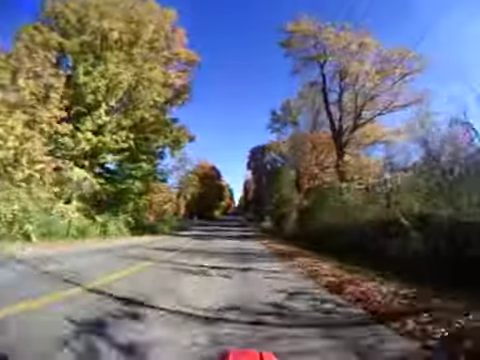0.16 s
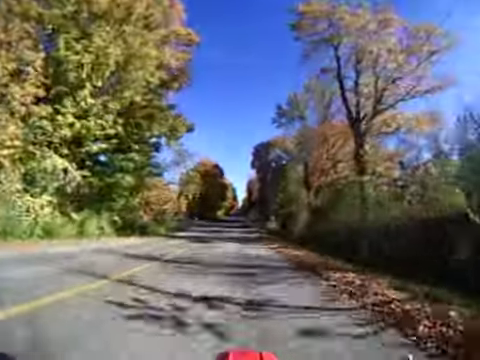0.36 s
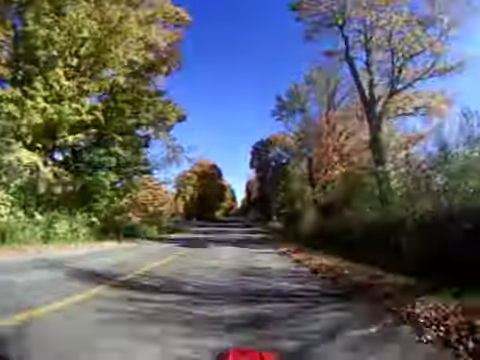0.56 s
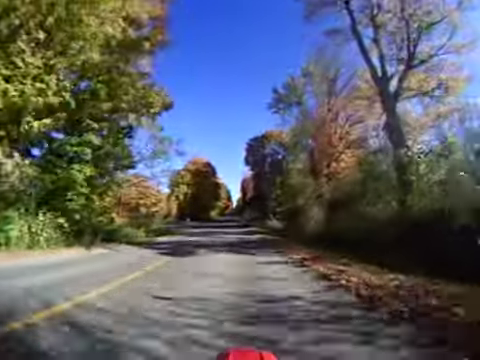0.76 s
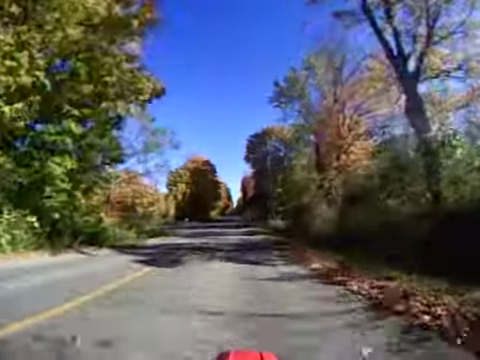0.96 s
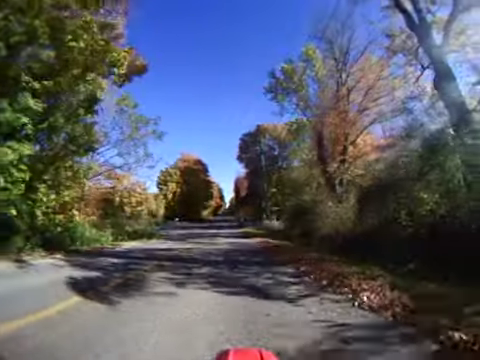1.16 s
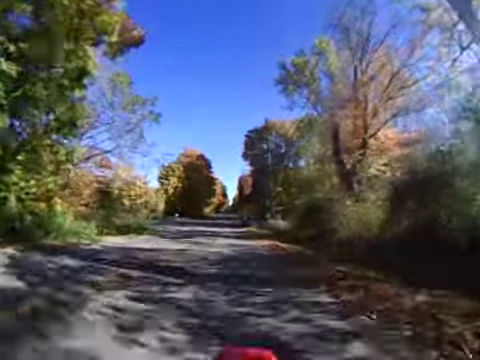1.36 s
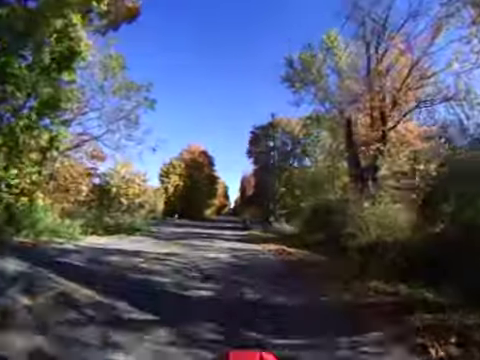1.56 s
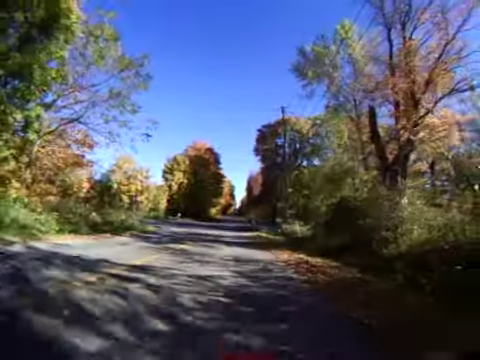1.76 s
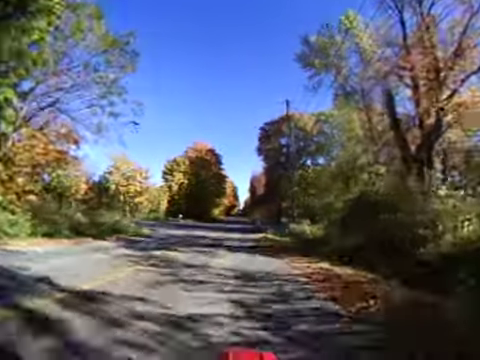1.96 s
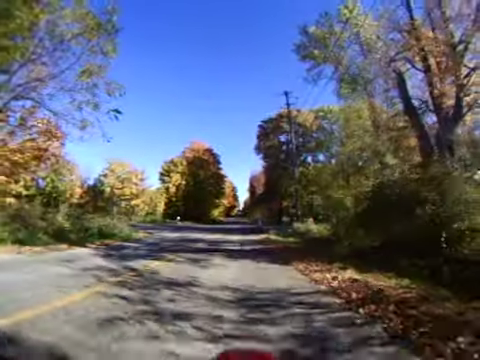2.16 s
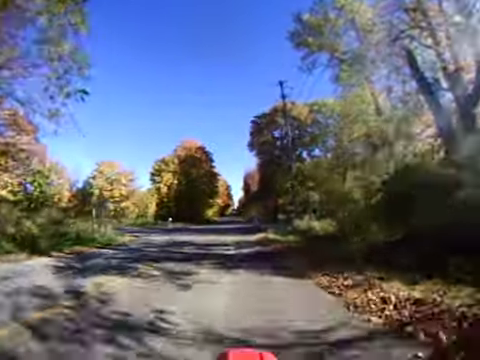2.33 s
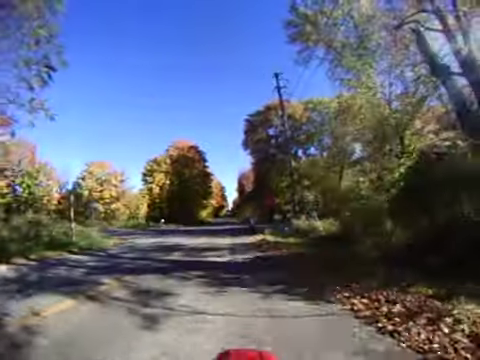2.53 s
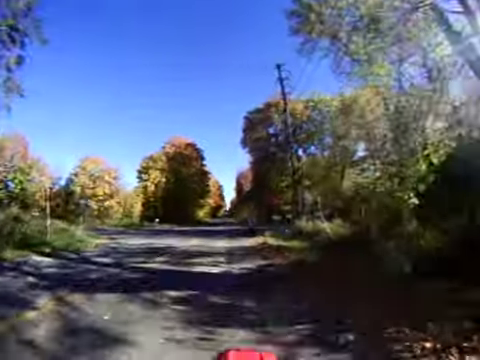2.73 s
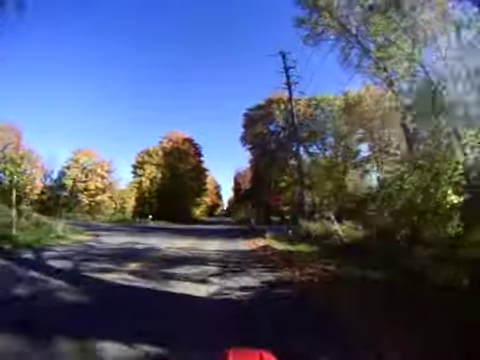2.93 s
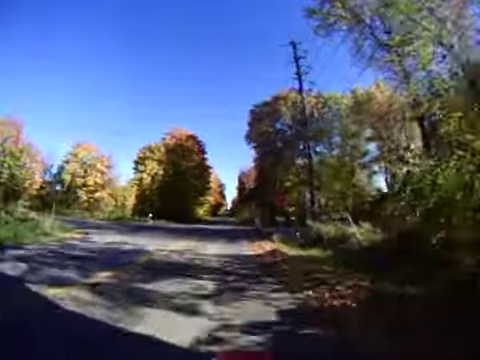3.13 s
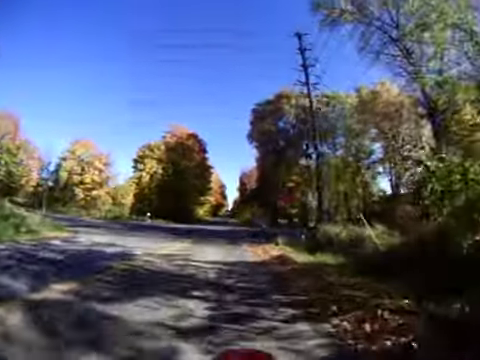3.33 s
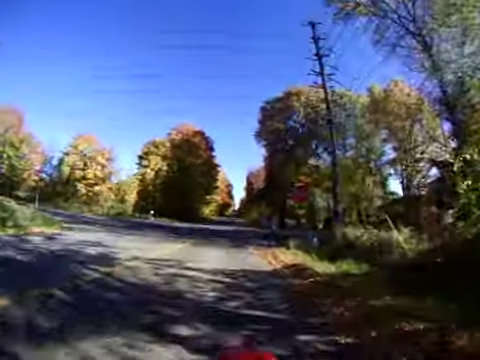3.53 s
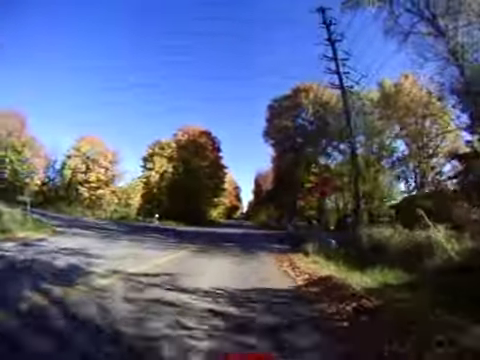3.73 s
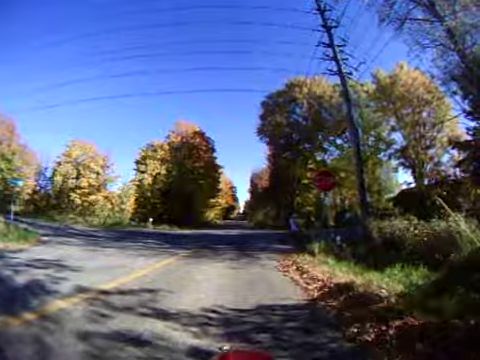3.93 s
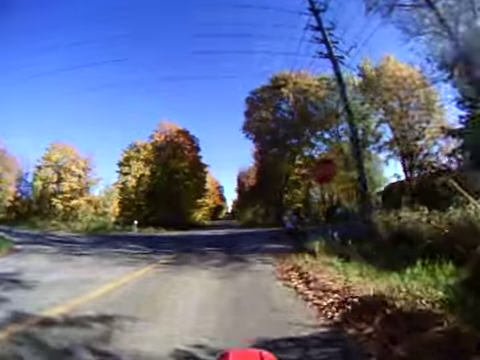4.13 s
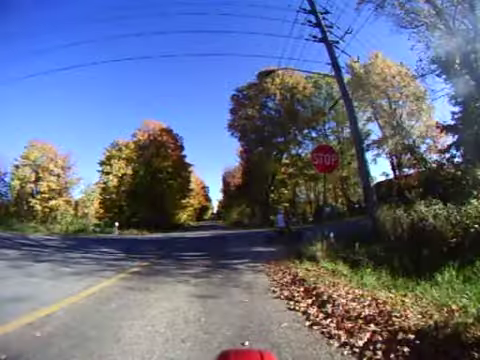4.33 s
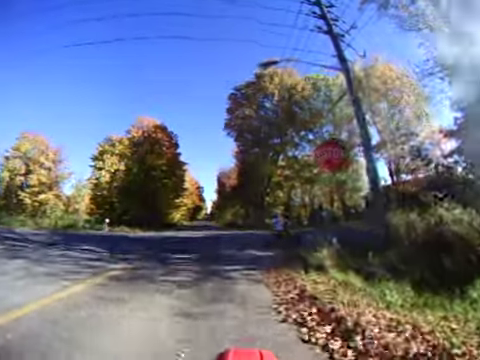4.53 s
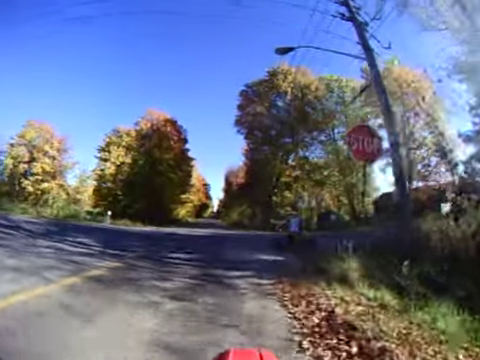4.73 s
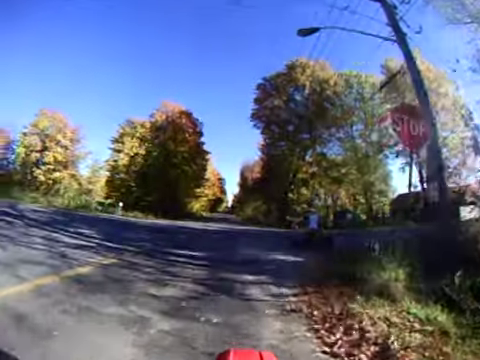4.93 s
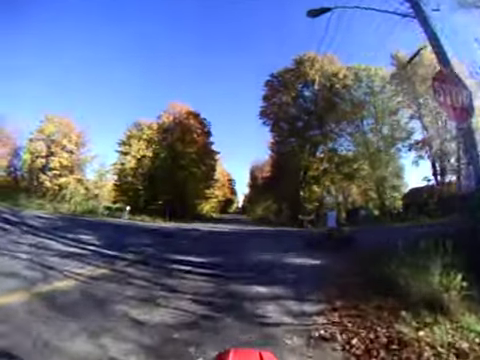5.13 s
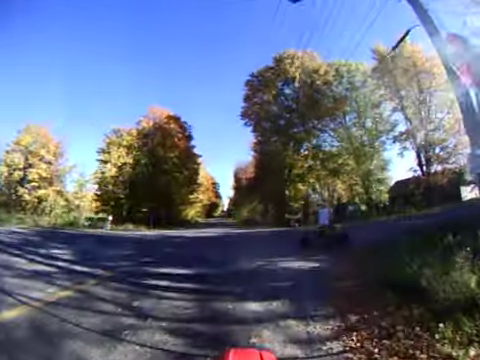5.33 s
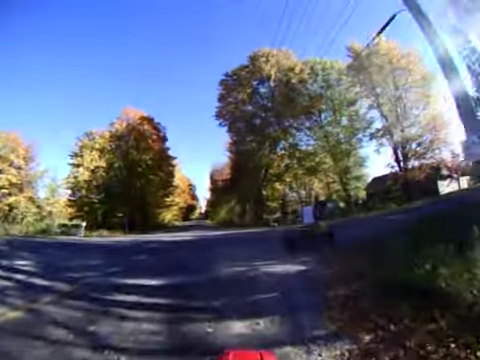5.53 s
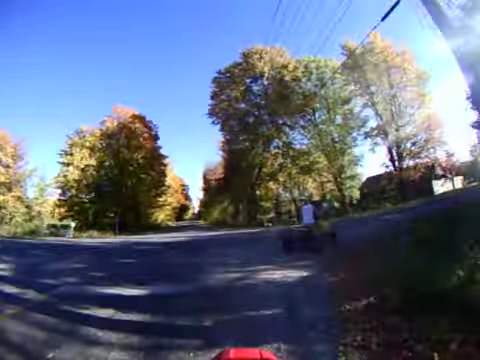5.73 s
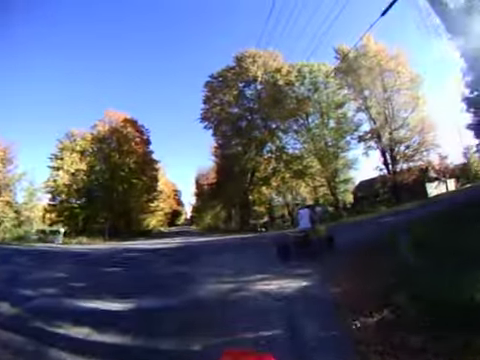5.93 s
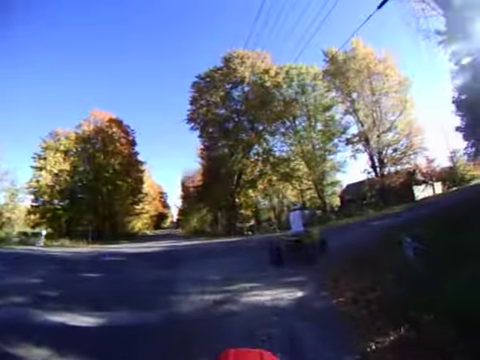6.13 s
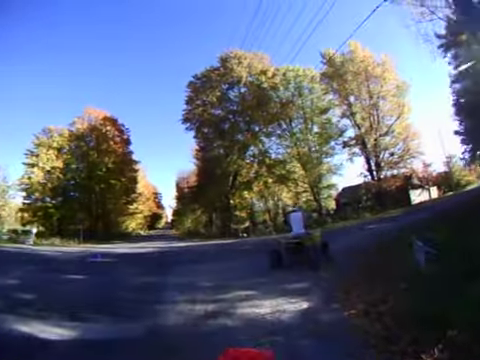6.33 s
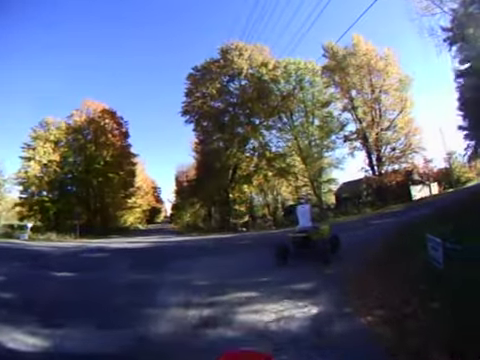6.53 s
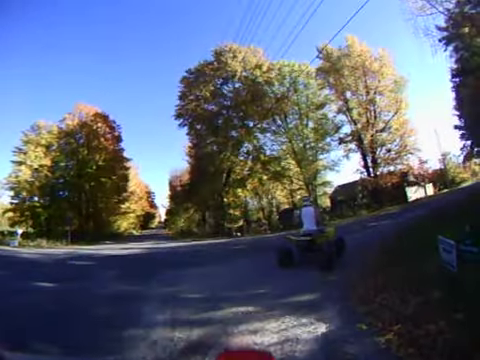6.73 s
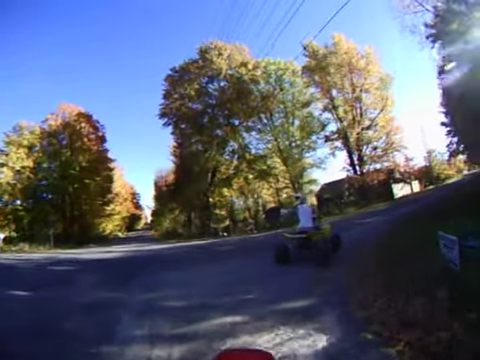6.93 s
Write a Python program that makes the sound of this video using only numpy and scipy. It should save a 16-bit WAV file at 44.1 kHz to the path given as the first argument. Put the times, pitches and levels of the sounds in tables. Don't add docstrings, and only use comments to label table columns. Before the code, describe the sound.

A four-stroke dirt bike is heard from a small camera bolted to it on an outdoor road. Its loud buzzing drone falls, jumps back up at three downshift blips with sharp cracks and knocks, then drops to a soft, puttering idle. A brief rev rises at the very end. The sound is narrow, overloaded and crunchy on the loud peaks.

```python
import sys
import numpy as np
from scipy import signal
from scipy.io import wavfile
from scipy.ndimage import uniform_filter1d

SR = 44100
rng = np.random.default_rng(int(sys.argv[2]) if len(sys.argv) > 2 else 0)


def wav_record(signal):
    frames = np.transpose(np.atleast_2d(signal))
    bounded = np.clip(frames, -1, 1)
    quanta = np.round(bounded * 32767).astype(np.int16)
    wavfile.write(sys.argv[1], SR, quanta)


def ratio_of_db(decibels):
    return 10 ** (np.asarray(decibels, float) / 20)


N = 312228

# centre in Hz, width in Hz, level in dB.
CASING_MODES = [(602.2, 110, 4.5), (810, 130, -16.5), (1247, 200, 1), (1843, 430, -10), (2238, 300, -3.5),
                (2550, 130, -12), (2880, 110, -4), (3218, 67, -6)]


def unit(x):
    return x / np.sqrt(np.mean(x ** 2))


def ring(x, modes):
    total = 0
    for hz, width_hz, db in modes:
        b, a = signal.iirpeak(hz, hz / width_hz, fs=SR)
        total = total + ratio_of_db(db) * signal.lfilter(b, a, x)
    return total


def cut(x, hz, kind, order=2):
    return signal.sosfilt(signal.butter(order, hz, kind, fs=SR, output="sos"), x)


def walk(rate_hz):
    hold = int(SR / rate_hz)
    steps = np.repeat(rng.standard_normal(N // hold + 1), hold)
    return 1.2 * uniform_filter1d(uniform_filter1d(steps, hold), hold)[:N]


def steady(x, window_s=0.17):
    return x / np.sqrt(uniform_filter1d(x ** 2, int(window_s * SR)) + 1e-12)


def read(table, at):
    return np.interp(at, *np.transpose(table))


def crank(now_s):
    # time in seconds, crank speed in Hz.
    speed_curve = [(0.0, 89.5), (0.31, 86.0), (0.54, 81.3), (0.7, 79.5), (1.075, 73.2), (1.17, 82.0),
                   (1.24, 82.3), (1.4, 86.0), (1.56, 87.1), (2.03, 79.1), (2.78, 64.8), (2.92, 79.1),
                   (3.24, 78.6), (4.32, 55.8), (4.47, 79.1), (4.73, 65.1), (5.62, 33.6), (6.42, 21.9)]
    pickup_s, pickup_hz_per_s = 6.88, 125
    full_throttle_hz_per_s, lag_s = 90, .05
    hz = read(speed_curve, now_s) + pickup_hz_per_s * np.maximum(now_s - pickup_s, 0)
    opening = np.clip(np.gradient(hz) * SR / full_throttle_hz_per_s, 0, 1)
    return hz, cut(opening, 1 / (2 * np.pi * lag_s), "low", order=1)


def shake_levels(hz):
    # crank speed in Hz, level in dB.
    once_curve = [(22, -48.5), (48, -30.5), (66, -35), (73, -25.5), (79.3, -21)]
    # crank speed in Hz, level in dB.
    twice_curve = [(22, -53), (43, -43.5), (52, -23), (67, -17.5), (77, -15.5), (79.2, -12.5)]
    # crank speed in Hz, level in dB.
    thrice_curve = [(30, -56.5), (45, -30), (58, -44.5), (68, -29), (77, -25), (79.3, -18.5)]
    # crank speed in Hz, level in dB at once, at twice, at three times.
    resonance_rows = [(80.1, -13.5, -11, -10.5), (80.8, -10, -10.5, -11), (81.4, -7.5, -11.5, -19),
                      (82.4, -5.5, -9, -17), (83.2, -4.8, -7.8, -16.5), (84.2, -2.7, -4.8, -16),
                      (87, -1.8, -2.8, -24), (89, -2.6, -3.8, -28)]
    levels_db = []
    for k, low_curve in enumerate([once_curve, twice_curve, thrice_curve], start=1):
        high_curve = [(row[0], row[k]) for row in resonance_rows]
        levels_db.append(read(list(low_curve) + high_curve, hz))
    return levels_db


def shake(turns, hz, once_db, twice_db, thrice_db, loose):
    # crank speed in Hz, lead at once in cycles, lead at three times in cycles.
    mount_leads = [(72, 0, .2), (78, 0, .09), (79.5, .05, .0), (80.3, .08, -.08), (82.4, .01, -.28),
                   (84, -.03, -.3), (87, -.06, -.25), (89, -.09, -.25)]
    speed_hz, *leads = np.transpose(mount_leads)
    lead_once, lead_thrice = (np.interp(hz, speed_hz, lead) for lead in leads)
    once = ratio_of_db(once_db + 1.1 * loose * walk(40)) * np.cos(2 * np.pi * (turns + lead_once))
    twice = ratio_of_db(twice_db + 1.2 * loose * walk(40)) * np.cos(4 * np.pi * turns)
    thrice = ratio_of_db(thrice_db + 2.5 * loose * walk(40)) * np.cos(2 * np.pi * (3 * turns + lead_thrice))
    half_db = twice_db - 5 - .45 * np.abs(1.5 * hz - 116) + 2.5 * walk(25) - 8 * (1 - loose)
    half = ratio_of_db(half_db) * np.cos(3 * np.pi * turns)
    return np.sqrt(2) * (once + twice + thrice + half)


def boom(turns, hz, throttle):
    # centre in Hz, width in Hz, level in dB.
    pipe_modes = [(126.7, 80, 0), (194.9, 41, -5), (241.15, 51, 0.5), (562.6, 145, -5)]
    # crank speed in Hz, level in dB.
    boom_curve = [(22, -32.5), (34, -29), (52, -23.5), (76, -22), (79.5, -15.5), (82, -24), (90, -24.5)]
    throttle_db, lug_hz = 4, 60
    whole = np.floor(turns).astype(int)
    at = np.flatnonzero(np.diff(whole)) + 1
    size = ratio_of_db(1.2 * rng.standard_normal(1000))[whole[at]]
    pulses = np.zeros(N)
    pulses[at] = size * np.where(whole[at] % 2, .2, 1)
    gas = .25 + np.clip(1 - hz / 66, 0, 1) * 3
    flow = steady(pulses) + gas * rng.standard_normal(N)
    tone = steady(cut(ring(ring(flow, pipe_modes), pipe_modes), 85, "high", order=4))
    level_db = read(boom_curve, hz) + throttle_db * throttle * lug_hz / hz - .05 * hz + 2.0
    return ratio_of_db(level_db) * tone


def clatter(turns, hz, throttle, pull_db):
    base_db, db_per_hz, throttle_db, top_db = -57, 0.4147, 4.5, -28
    tap_hz, tap_width_hz, tap_share = 620, 260, 1.2
    beat = ratio_of_db(1.8 * rng.standard_normal(1000))[np.floor(turns).astype(int)]
    gate = 1.7 + beat * np.sin(np.pi * (turns + .4)) ** 4
    noise = gate * ratio_of_db(1.0 * walk(120)) * rng.standard_normal(N)
    taps = steady(np.diff(np.floor(turns - .1), prepend=-1.))
    for _ in range(2):
        taps = ring(taps, [(tap_hz, tap_width_hz, 0)])
    rattle = ring(noise, CASING_MODES) + tap_share * 2 * taps + .12 * cut(noise, 930, "high")
    level_db = np.minimum(base_db + db_per_hz * hz + throttle_db * throttle, top_db)
    return ratio_of_db(level_db + 0.4 * pull_db + 3.4) * steady(cut(rattle, 440, "high"), window_s=0.18)


def cracks():
    # start in seconds, peak in dB.
    pop_events = [(1.0079, -8.5), (1.0942, -7), (1.121, -6), (1.1480, -8), (2.8005, -19), (2.8300, -9.5),
                  (2.857, -25), (2.8846, -8), (4.349, -13.5), (4.3808, -11.5), (4.4116, -9),
                  (4.4392, -16.5), (4.8919, -18), (5.433, -28), (5.627, -29), (5.7253, -27), (5.7972, -34),
                  (5.9402, -28), (5.9754, -29), (6.0482, -26), (6.0952, -25), (6.1543, -31), (6.25, -25.5),
                  (6.3386, -29), (6.4243, -30), (6.5139, -24.5), (6.7635, -30), (6.931, -17),
                  (6.9873, -11.5), (7.0295, -13)]
    # start in seconds, peak in dB, colour in Hz.
    knock_events = [(1.0363, -6, 2370), (2.7400, -5.5, 3300), (4.294, -18, 2880), (4.3173, -3.5, 3300),
                    (4.6986, -16.5, 3060), (5.4914, -29.5, 2550), (5.6616, -27.5, 2950),
                    (5.8674, -20, 2650), (6.602, -25, 2430), (6.6960, -13, 2240), (6.852, -30.5, 2826)]
    pop_hz, pop_thump_db, pop_fade_s = 1250, 1, .005
    knock_thump_db, knock_fade_s = -2.5, .0065
    t = np.arange(2400) / SR
    hits = [(s, db, pop_hz, pop_thump_db, pop_fade_s) for s, db in pop_events]
    hits += [(*knock, knock_thump_db, knock_fade_s) for knock in knock_events]
    out = np.zeros(N + len(t))
    for s, db, hz, thump_db, fade_s in hits:
        hiss = rng.standard_normal(len(t))
        burst = hiss * (1 - np.exp(-t / .0003)) * np.exp(-t / fade_s)
        burst = ring(burst, CASING_MODES) + 1.9 * ring(burst, [(hz, 500, 0)])
        sharp = ratio_of_db(db + 2.5) * burst / np.abs(burst).max()
        thump = ratio_of_db(db + thump_db - 8) * np.exp(-t / .012) * np.sin(2 * np.pi * 240 * t)
        i = int(s * SR)
        out[i:i + len(t)] += sharp + thump
    return out[:N]


def jolts(now_s):
    # time in seconds, size in linear amplitude.
    jolt_events = [
        (2.9365, 2.1),
    ]
    swings = [((now_s - s) / .0022, size) for s, size in jolt_events]
    return -sum(size * u * np.exp(-u ** 2) for u, size in swings)


def rumble(now_s, pull_db):
    # time in seconds, level above the rumble in dB.
    bump_events = [
        (.65, 19.5),
        (1.28, 21),
        (2.03, 22.5),
        (2.94, 10),
        (3.15, 21),
        (4.47, 20),
        (5.24, 10),
        (6.92, 13),
    ]
    base_db, shake_share, bump_s = -48, 0.4, 0.065
    bumps_db = sum(db * np.exp(-((now_s - s) / bump_s) ** 2) for s, db in bump_events)
    level_db = base_db + shake_share * pull_db + bumps_db + 6.0
    lows = cut(cut(rng.standard_normal(N), 55, "low"), 22, "high")
    return ratio_of_db(level_db + 5.1 * walk(8.2)) * unit(lows)


def scene():
    quiet_mount_db, lock_per_db = -15, .055
    now_s = np.arange(N) / SR
    hz, throttle = crank(now_s)
    turns = np.cumsum(hz) / SR
    once_db, twice_db, thrice_db = shake_levels(hz)
    pull_db = np.maximum(once_db - quiet_mount_db, 0)
    lines = shake(turns, hz, once_db, twice_db, thrice_db, loose=1 - lock_per_db * pull_db)
    engine = lines + boom(turns, hz, throttle) + clatter(turns, hz, throttle, pull_db)
    return (engine + cracks() + jolts(now_s) + rumble(now_s, pull_db))[None]


def band_limit(x):
    return signal.sosfilt(signal.butter(12, 15800, fs=SR, output="sos"), x)


def record(dry):
    rail_up, rail_down, coupling_hz = .61, .94, 78
    full_scale, ceiling = .7, .7
    rail = np.where(dry > 0, rail_up, rail_down)
    x = dry / (1 + np.abs(dry / rail) ** 6) ** (1 / 6)
    x = cut(x, coupling_hz, "high", order=1)
    x = signal.sosfilt(signal.ellip(4, .5, 13, 3420, fs=SR, output="sos"), x)
    coarse = signal.resample_poly(x, 80, 441, axis=1)
    coarse = np.where(np.abs(coarse) > full_scale, 0, coarse)
    fine = signal.resample_poly(coarse, 441, 80, axis=1, window=("kaiser", 12.))[:, :N]
    fine = signal.sosfiltfilt(signal.cheby2(10, 30, 4650, fs=SR, output="sos"), fine)
    return band_limit(np.clip(fine, -ceiling, ceiling))


dry = scene()
out = record(dry)
wav_record(out)
```